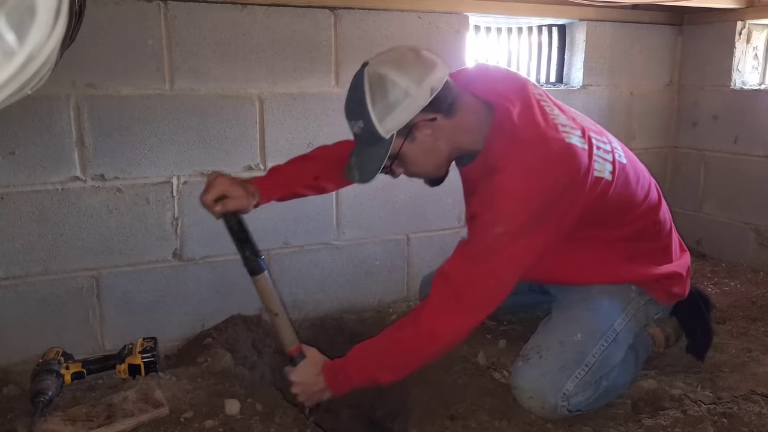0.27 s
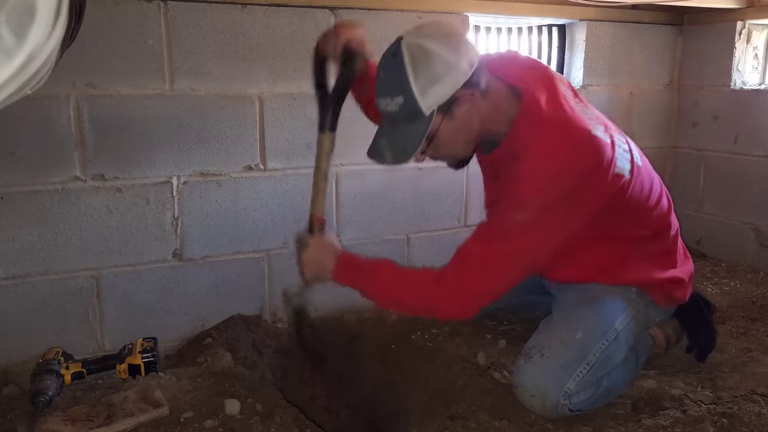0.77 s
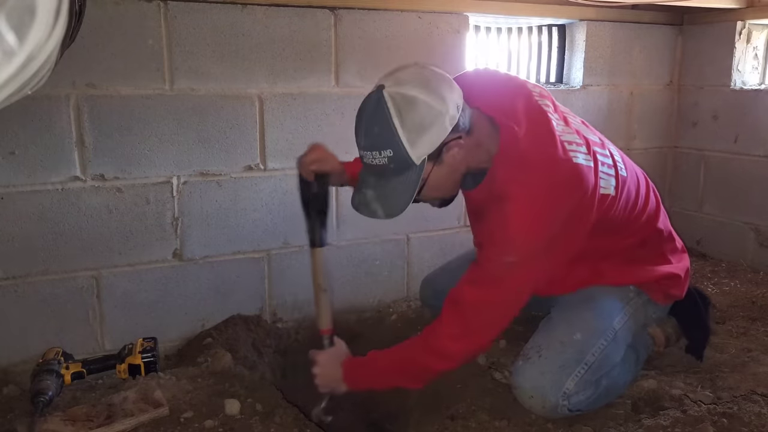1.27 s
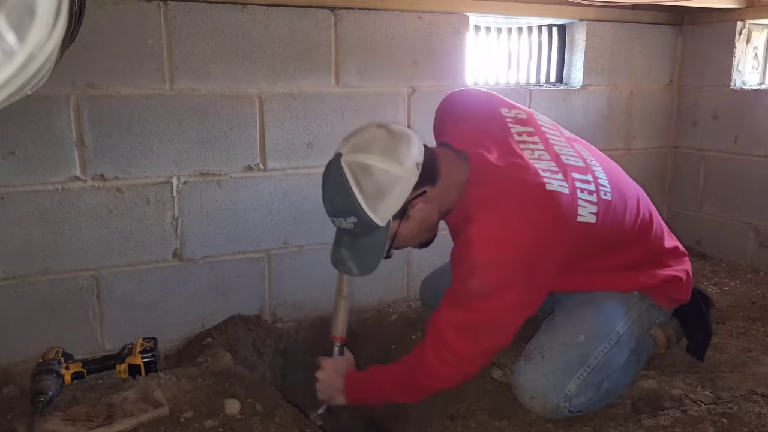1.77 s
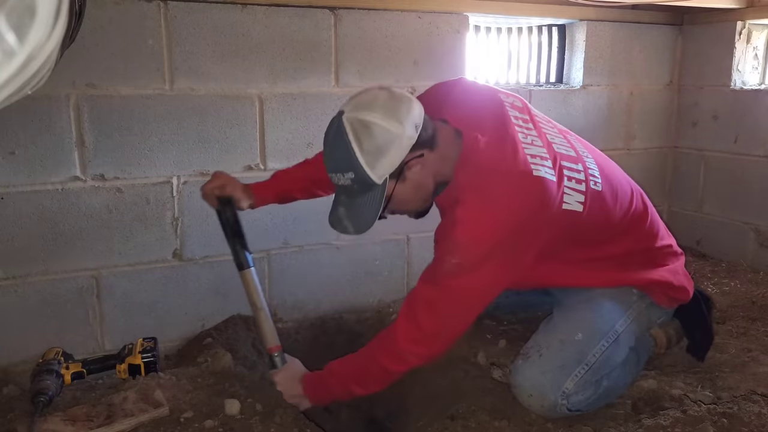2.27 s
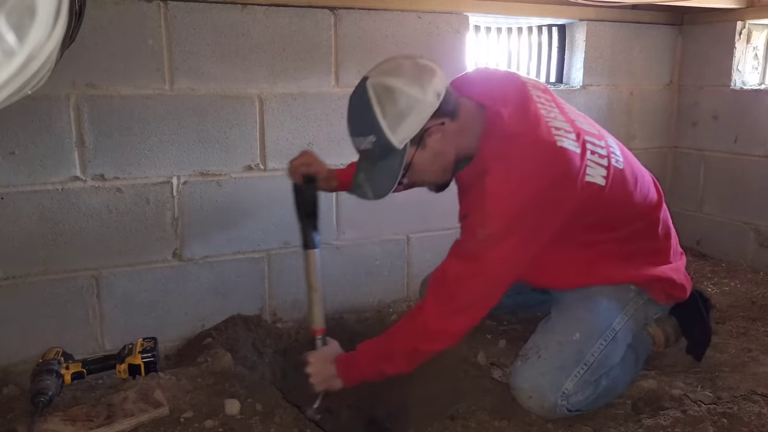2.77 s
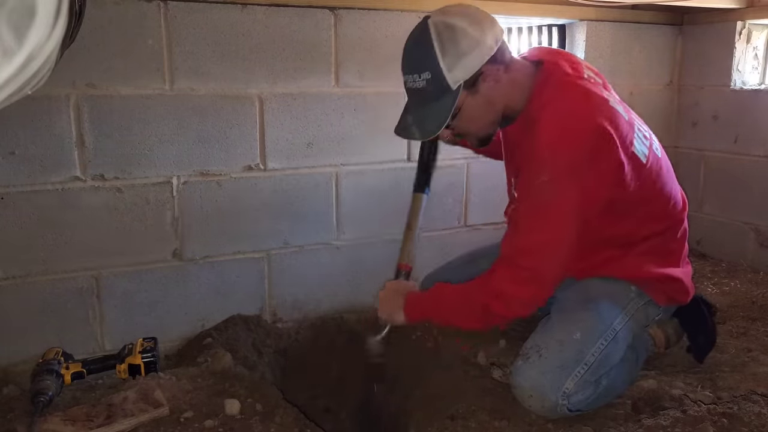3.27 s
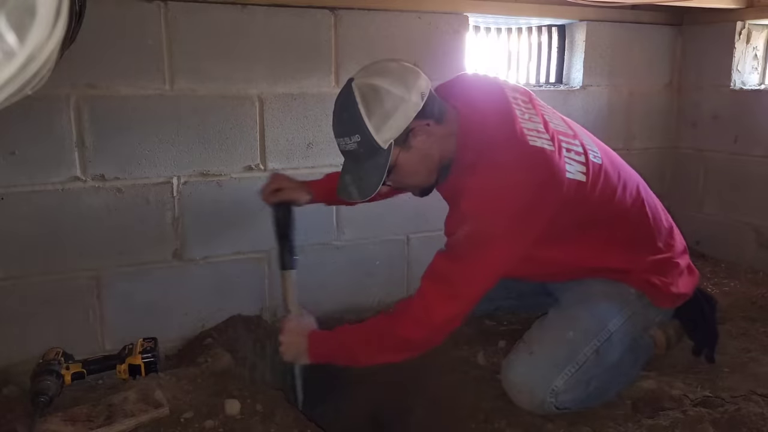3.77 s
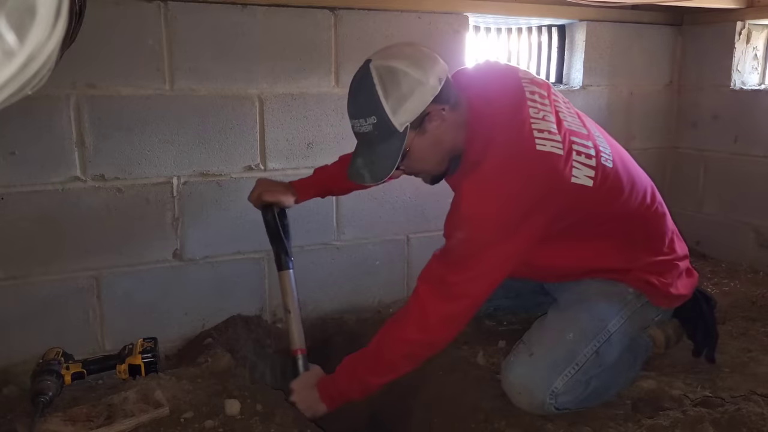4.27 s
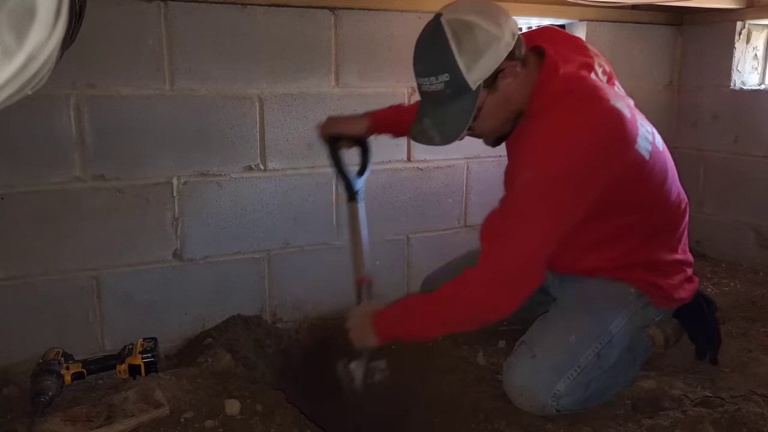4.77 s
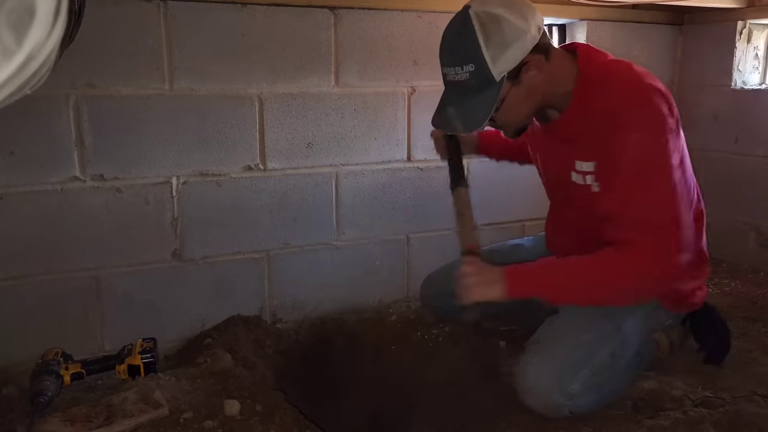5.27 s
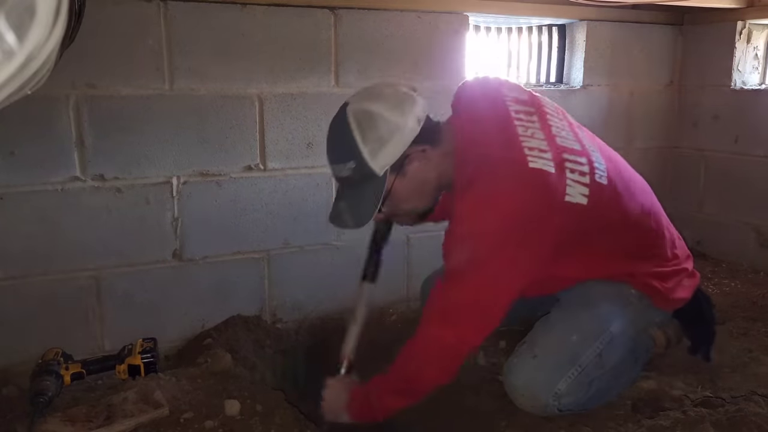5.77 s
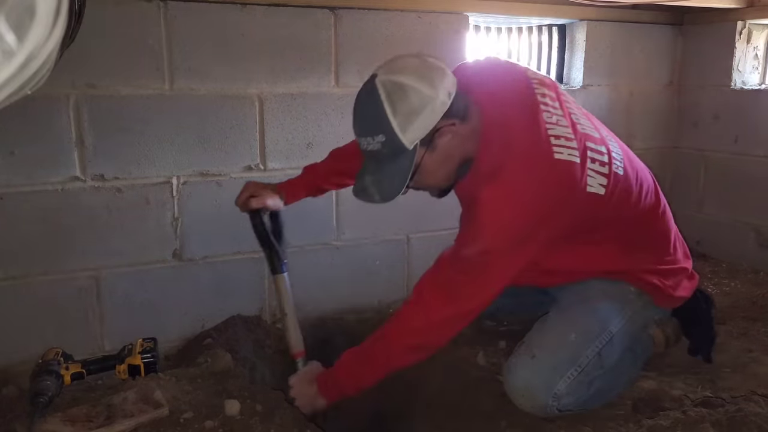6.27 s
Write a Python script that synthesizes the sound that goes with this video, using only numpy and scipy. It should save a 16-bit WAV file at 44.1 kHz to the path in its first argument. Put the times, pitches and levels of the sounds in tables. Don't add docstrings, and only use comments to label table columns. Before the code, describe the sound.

Steel bites gravelly earth in irregular bursts: bright gritty cracks, short dull mid-pitched clanks quickly choked by soil, and soft low thumps under the hardest blows. Between them come scrapes, stone scuffs and tiny trickles of dirt, with near-quiet gaps. The sound is slightly left of a phone microphone, with a short, dense, bass-leaning room tail, a wavering low hum and slight hiss.

```python
import sys
import numpy as np
from scipy import signal
from scipy.fft import rfft, irfft
from scipy.io import wavfile
from scipy.ndimage import uniform_filter1d

SR = 44100
rng = np.random.default_rng(int(sys.argv[2]) if len(sys.argv) > 2 else 0)


def store_wav(level_fs):
    pcm = np.round(np.clip(np.atleast_2d(level_fs), -1, 1) * 32767)
    wavfile.write(sys.argv[1], SR, pcm.T.astype(np.int16))


def makeup_ratio(level_db):
    decades = np.asarray(level_db, float) / 20
    return 10 ** decades


N = 287532


def ring(x, hz, t60):
    pole = np.exp(2j * np.pi * hz / SR - np.log(1000) / (t60 * SR))
    gain = np.sqrt(2 - 2 * abs(pole) ** 2)
    return signal.lfilter([gain], [1, -pole], x).imag


def walk(ms):
    position = np.arange(N) / (ms * 0.00091 * SR)
    return np.interp(position, np.arange(N // 20), rng.standard_normal(N // 20))


def grains(spread_db, clump_ms, clump_db):
    noise = rng.standard_normal(N)
    level_db = spread_db * rng.exponential(size=N) + clump_db * walk(clump_ms)
    x = noise * makeup_ratio(level_db)
    return x / np.std(x)


def bandpass(x, order, low_hz, high_hz):
    return signal.sosfilt(signal.butter(order, [low_hz, high_hz], "bandpass", fs=SR, output="sos"), x)


def shape(x, points):
    hz, db = np.transpose(points)
    f = np.maximum(np.fft.rfftfreq(x.shape[-1], 1 / SR), 1)
    y = irfft(rfft(x) * makeup_ratio(np.interp(np.log(f), np.log(hz), db)), x.shape[-1])
    return y / np.std(y)


def add(track, start_s, x):
    i = int(start_s * SR)
    track[i:i + len(x)] += x[:N - i]


# peak in seconds, grit peak in dB, blade in dB, lead mode in Hz.
CRACKS = [(.414, -33.5, -33.5, 560), (.492, -24.5, -30, 646), (.657, -26, -35.5, 923),
          (2.027, -53.5, -70, 648.6), (2.0707, -44, -68, 642), (2.2904, -63.5, -38.5, 688),
          (2.3705, -16.5, -11, 632), (2.4773, -20.5, -18, 437), (2.5054, -31, -37, 507),
          (2.9627, -37.5, -32, 652), (3.0814, -21, -25, 630), (3.7249, 0.5, -8, 427.2),
          (4.065, -43, -59, 620), (4.166, -50, -26, 590), (4.4802, -17.5, -23.5, 680),
          (4.8434, -37.5, -40, 596), (5.0509, -12, -26, 993), (5.1811, -43.5, -77.5, 670),
          (5.3163, -40.5, -53, 492)]
# [s, dB, dB, Hz].
CRUNCHES = [(.0624, -27, -23, 675), (.3845, -32.5, -48, 544), (.8435, -50, -49, 1013),
            (1.1638, -5.5, -15.5, 622), (1.9106, -17.5, -30, 655), (2.4189, -15.5, -14.5, 485),
            (2.5336, -43, -27.5, 400), (2.7437, -53.5, -51.5, 655), (3.3174, -69, -45.5, 445),
            (3.732, -14, -13, 390), (4.3276, -36, -49, 500), (4.4488, -37, -61, 557),
            (4.5256, -20, -27.5, 679), (4.9576, -31.5, -51, 476), (6.068, -36.5, -58, 950),
            (6.1684, -35, -38.5, 636), (6.4474, -50.5, -40, 622)]
# [s, dB, dB, Hz].
SCUFFS = [(.008, -33.5, -33.5, 655), (.032, -47, -30.5, 655), (.36, -53, -41.5, 990), (.46, -25, -34, 646),
          (.698, -26, -23.5, 650), (1.16, -19.5, -51, 619), (1.172, -19, -40, 680), (1.205, -21, -20, 299),
          (1.909, -31, -45, 634), (2.195, -65, -46.5, 603), (2.645, -67, -56, 317.5), (3.14, -60, -34, 700),
          (3.39, -63.5, -44.5, 624), (3.72, -23, -33, 608), (3.947, -31, -36, 700), (4.29, -43, -45, 610),
          (4.44, -57, -37, 590), (4.985, -42, -47.5, 380), (5.207, -47, -63, 666),
          (5.914, -14.5, -40.5, 526), (5.942, -40, -21.5, 830), (6.2, -51, -35, 434),
          (6.287, -36, -34, 662), (6.4, -64, -52, 627), (6.515, -24.5, -32, 645)]
# [s, dB, dB, Hz].
GRINDS = [(.432, -28.5, -32.5, 510), (.509, -11.5, -27, 640), (.585, -43, -40.5, 586), (.73, -16, -30, 926),
          (1.27, -46, -53, 448.3), (2.555, -41.5, -31, 441), (2.578, -43, -30.5, 469.6),
          (2.6, -47, -38, 383), (2.985, -26, -30.5, 696), (3.435, -37, -64.5, 670), (4.01, -28.5, -32, 667),
          (4.106, -58, -39.5, 680), (4.195, -30.5, -33, 596), (4.352, -36.5, -36, 482.4),
          (4.61, -32.5, -47, 560), (5.018, -49, -46, 560), (5.926, -8.5, -23, 1003)]


def contacts(crackle, shake):
    knock_rise_ms = 1.0
    # events, their delay in s, rise in ms and crumbling time in ms
    kinds = [(CRACKS, knock_rise_ms / 1000, knock_rise_ms, 2.6),
             (CRUNCHES, knock_rise_ms / 1000, knock_rise_ms, 7.33),
             (SCUFFS, 0, 2.1, 4),
             (GRINDS, 0, 11, 7)]
    lead_level_db, lead_t60_s = -0.5, 0.024
    grit, force, lead = np.zeros((3, N))
    for rows, delay_s, rise_ms, fall_ms in kinds:
        for s, grit_db, blade_db, lead_hz in rows:
            peak_s = s + delay_s
            a, b = max(int((peak_s - .06) * SR), 0), min(int((peak_s + .2) * SR), N)
            ms = 1000 * (np.arange(a, b) / SR - peak_s)
            env = np.where(ms < 0, np.exp(-(ms / rise_ms) ** 2), np.exp(-ms / fall_ms))
            push = makeup_ratio(blade_db) * env ** 1.88
            grit[a:b] += makeup_ratio(grit_db - 5.5) * env * crackle[a:b]
            force[a:b] += push * shake[a:b]
            skips = 0.12 * np.cos(2 * np.pi * lead_hz * ms / 1000) + 0.41 * shake[a:b]
            lead[a:b] += makeup_ratio(lead_level_db) * ring(push * skips, lead_hz, lead_t60_s)
    return grit, force, lead


# pitch in Hz, level in dB per Hz.
GRIT_COLOUR = [(710, -34), (1200, -5), (2000, -4.5), (3400, -3.5), (5600, -3.5), (8000, -4.5),
               (9800, -11.5), (12700, -7.5), (15700, -17.5), (16400, -36.5)]


def gravel(x):
    patch_ms, patch_db = 4.0, 2.8
    edges = np.geomspace(700, 17000, num=12)
    mix = np.zeros(N)
    for low_hz, high_hz in zip(edges, edges[1:]):
        mix += bandpass(x, 2, low_hz, high_hz) * makeup_ratio(patch_db * walk(patch_ms))
    return shape(mix, GRIT_COLOUR)


# pitch in Hz, level in dB, 60 dB decay in seconds.
BLADE_MODES = [(348, -11.5, .07), (481.7, -2, 0.085), (560, -5.5, 0.12), (655, -5, 0.087),
               (700, 4.5, 0.017), (830, -3.5, 0.031), (990, 2, 0.043), (1250, -6, 0.02),
               (1406, -6.5, 0.013), (1697, -17.5, 0.08), (1950, -19, 0.026), (2125, -13.5, 0.024),
               (2860, -17, 0.01), (3160, -25.5, 0.012), (3600, -12.5, 0.01)]


def blade_in_soil(force):
    longest_t60_s = .07
    return sum(makeup_ratio(db - 9.0) * ring(force, hz, min(t60, longest_t60_s)) for hz, db, t60 in BLADE_MODES)


# start in seconds, peak in dB, pitch in Hz, held time in ms.
CHATTER = [
    (1.166, -6.5, 640.5, 6.5),
    (1.198, -24, 622, 11.8),
    (2.37, -21, 560, 5.6),
    (2.6, -38.5, 331, 52),
    (3.724, -12.5, 386.4, 6.4),
    (3.727, -11.5, 887, 4.8),
    (5.918, -16, 428, 7.3),
    (5.932, -14, 841, 11),
    (6.17, -45, 693, 140),
    (6.36, -46, 654, 94),
]


def chatter():
    out, t = np.zeros(N), np.arange(int(.25 * SR)) / SR
    for s, db, hz, held_ms in CHATTER:
        skips = makeup_ratio(3.9 * walk(5.0)[:len(t)])
        phase_drift = 0.19 * walk(18.0)[:len(t)]
        drive = np.cos(2 * np.pi * hz * t + phase_drift) * skips * (t < held_ms / 1000)
        tone = ring(drive, hz, 0.024)
        add(out, s, makeup_ratio(db) * tone / np.abs(tone).max())
    return out


# start in seconds, held seconds, grit in dB, blade in dB.
SCRAPES = [(0, 0.017, -45.5, -34), (.07, 0.01, -43.5, -41), (.11, 0.037, -53.5, -42.5),
           (0.422, 0.051, -42, -35.5), (0.498, 0.0067, -30, -34), (.76, 0.021, -44.5, -45.5),
           (.54, 0.072, -57.5, -40), (.66, .02, -45.5, -37), (0.691, 0.025, -29.5, -29.5),
           (2.168, 0.093, -57.5, -52), (2.438, 0.065, -45, -30), (2.531, 0.049, -49.5, -38.5),
           (2.962, 0.15, -46.5, -43), (3.152, 0.12, -61.5, -48.5), (3.862, .13, -49.5, -45),
           (4.03, 0.067, -47.5, -43.5), (4.18, 0.071, -54.5, -44.5), (4.332, 0.021, -48.5, -38.5),
           (4.498, 0.11, -43.5, -35.5), (4.83, 0.032, -51.5, -49), (4.9, .12, -56.5, -50.5),
           (5.231, 0.084, -63.5, -57.5), (6.091, 0.09, -50.5, -47.5), (6.182, 0.11, -47, -40.5),
           (6.359, 0.048, -64.5, -57.5), (6.455, 0.057, -47, -39.5)]
# start in seconds, held seconds, grit in dB.
TRICKLES = [(0.219, 0.0046, -66), (.27, .01, -75.5), (.36, 0.025, -63), (1.52, 0.0088, -64.5),
            (1.571, 0.011, -66), (1.651, 0.028, -76), (1.969, 0.015, -69), (2.028, .01, -71.5),
            (2.09, .02, -57.5), (2.32, 0.044, -65.5), (2.74, 0.018, -75.5), (3.418, 0.01, -46),
            (3.8, 0.099, -62), (4.12, 0.059, -57.5), (4.4, 0.025, -57), (4.8, 0.0089, -57.5),
            (5.099, 0.0074, -66), (5.38, 0.087, -74), (5.49, 0.054, -62.5), (5.6, 0.14, -81.5),
            (6.0, 0.01, -51.5)]


def slide(crackle, shake):
    scrape_rise_db_s, scrape_fade_db_s = 901, 518.5
    trickle_rise_db_s, trickle_fade_db_s = 301, 302.5
    trickle_blade_db = -5
    dust_loss = 0.29
    rows = [(*row, scrape_rise_db_s, scrape_fade_db_s) for row in SCRAPES]
    rows += [(s, held, db, db + trickle_blade_db, trickle_rise_db_s, trickle_fade_db_s)
             for s, held, db in TRICKLES]
    t = np.arange(N) / SR
    grit, dust, force = np.zeros((3, N))
    for s, held, grit_db, blade_db, rise_db_s, fade_db_s in rows:
        near = slice(max(int((s - .2) * SR), 0), int((s + held + .3) * SR))
        rise_db = np.minimum(rise_db_s * (t[near] - s), 0)
        fade_db = fade_db_s * np.maximum(t[near] - s - held, 0)
        env = makeup_ratio(rise_db - fade_db)
        grit[near] += makeup_ratio(grit_db) * env
        dust[near] += makeup_ratio(grit_db - dust_loss * (blade_db - grit_db)) * env
        force[near] += makeup_ratio(blade_db) * env
    dull = signal.lfilter(*signal.butter(1, 5000, fs=SR), crackle)
    return grit * dull + dust * (crackle - dull), makeup_ratio(-7.0) * force * shake


# start in seconds, peak in dB, deep boom in dB, ring in seconds.
THUMPS = [(0.031, -41.5, -7, 0.47), (0.43, -45, -12, 0.2), (0.761, -43.5, -26.5, 0.21),
          (1.166, -25.5, -5.5, 0.34), (1.915, -40, 7, 0.15), (2.475, -42, -11.5, 0.17),
          (2.532, -36, -8, 0.22), (3.09, -45, -11.5, 0.26), (3.726, -19, -5, 0.21), (4.007, -44, -14, 1),
          (4.167, -43, -13, 0.69), (4.48, -44, -12.5, 0.57), (4.95, -43, -10.5, 0.49),
          (5.048, -42, -11.5, 0.15), (5.91, -22.5, -11, 0.15), (5.989, -33, -8.0, 0.35)]
# pitch in Hz, level in dB.
GROUND_MODES = [(50, -2.5), (70, -12.5), (88, 0.5), (120, 3), (146, -0.5), (208, -1), (257, -6)]


def thumps():
    out = np.zeros(N)
    t = np.arange(int(.5 * SR)) / SR
    for s, db, deep_db, t60 in THUMPS:
        push = np.exp(-t / 0.0078) * (1 - np.exp(-t / 0.0058)) * rng.standard_normal(len(t))
        boom = np.zeros(len(t))
        for i, (hz, mode_db) in enumerate(GROUND_MODES):
            mode = ring(push, hz, t60 * (90 / hz) ** 0.2)
            gain = makeup_ratio(mode_db + (deep_db if i == 0 else 0))
            boom += gain * mode / np.abs(mode).max()
        add(out, s, makeup_ratio(db - 5.5) * bandpass(boom, 3, 42, 300))
    return out


# pitch in Hz, level in dB, 60 dB decay in seconds.
FREE_MODES = [(3472, -3, .36), (4177, -2, .19), (4328, -7, .12), (4576, -9, .36), (4870, -11, .15),
              (5329, -11, .22), (6450, -5, .08)]


def flick():
    start_s, skid_s, tick_db, ring_db = 1.546, .014, -31.5, -36
    out, t = np.zeros(N), np.arange(int(.4 * SR)) / SR
    push = rng.standard_normal(len(t)) * np.exp(-t / skid_s)
    sound = makeup_ratio(tick_db) * bandpass(push, 4, 5900, 14000)
    for hz, db, t60 in FREE_MODES:
        mode = ring(push, hz, t60)
        sound += makeup_ratio(ring_db + db) * mode / mode.max()
    add(out, start_s, sound)
    return out


def room(direct, x):
    low_t60_s, mid_t60_s, high_t60_s = 0.2, 0.1, 0.1
    direct_db = -1.5
    t = np.arange(int(.4 * SR)) / SR
    noise = rng.standard_normal((8, len(t)))
    low = signal.lfilter(*signal.butter(2, 380, fs=SR), noise[:3])
    mid = signal.lfilter(*signal.butter(2, [380, 1000], "bandpass", fs=SR), noise[3:6])
    high = signal.lfilter(*signal.butter(2, 1000, "highpass", fs=SR), noise[6:])
    tail = 0.88 * (low[2] + 0.057 * low[:2]) * makeup_ratio(-60 * t / low_t60_s)
    tail = tail + 0.47 * (mid[2] + 0.4 * mid[:2]) * makeup_ratio(-60 * t / mid_t60_s)
    tail = tail + high * makeup_ratio(-60 * t / high_t60_s)
    tail = tail * (1 - np.exp(-t / 0.00098))
    tail = tail / np.sqrt(np.sum(tail[0] ** 2))
    heard = makeup_ratio(direct_db) * direct + signal.fftconvolve(x[None], tail, axes=1)[:, :N]
    spectrum = rfft(heard)
    power = np.abs(spectrum) ** 2 / (np.abs(rfft(direct)) ** 2 + 1e-9)
    smooth = uniform_filter1d(np.minimum(power, 8), size=1600)
    smooth = uniform_filter1d(smooth, size=1600)
    return irfft(spectrum / np.sqrt(smooth), N)


# pitch in Hz, level in dB per Hz.
HUM_COLOUR = [(20, -28), (45, -18), (65, -6.5), (88, 4), (115, -8.5), (155, -7), (190, -17.5), (250, -25),
              (330, -21), (1000, -30), (2500, -37.5), (4000, -35.5), (6000, -43), (16000, -57)]


def hum():
    noise = rng.standard_normal((3, N))
    low = signal.lfilter(*signal.butter(1, 500, fs=SR), noise)
    steps = np.repeat(rng.standard_normal(N // 2000 + 1), 2000)[:N]
    swell = makeup_ratio(0.28 * uniform_filter1d(steps, size=2000))
    hiss = 0.86 * (noise - low)[:2]
    return makeup_ratio(-56) * shape(low[2] * swell + hiss, HUM_COLOUR)


def at_phone(shovel):
    shade_db, lag_samples = 1.2, 4
    treble = signal.lfilter(*signal.butter(1, 900, "highpass", fs=SR), shovel)
    far = shovel - (1 - makeup_ratio(-shade_db)) * treble
    return np.array([shovel, np.roll(far, shift=lag_samples)])


def scene():
    blow_crackle = gravel(grains(spread_db=3.0, clump_ms=1.5, clump_db=3.5))
    blow_grit, blow_force, lead = contacts(blow_crackle, grains(2.7, 1.5, 1.3))
    slide_crackle = gravel(grains(spread_db=2.8, clump_ms=2.5, clump_db=3.0))
    slide_grit, slide_force = slide(slide_crackle, grains(2.0, 6.6, 2.8))
    blade = lead + chatter() + blade_in_soil(blow_force + slide_force)
    blade = signal.sosfilt(signal.butter(4, 310, "highpass", fs=SR, output="sos"), blade)
    shovel = blow_grit + slide_grit + blade + flick() + thumps()
    port_db = [[3.4], [2.0]]
    return makeup_ratio(port_db) * room(at_phone(shovel), shovel) + hum()


def roll_off(x):
    return signal.sosfilt(signal.butter(12, 16500, fs=SR, output="sos"), x)


def record(dry):
    cut = signal.sosfilt(signal.ellip(6, .3, 30, 15750, fs=SR, output="sos"), dry)
    mix = np.clip(cut, -1, 1)
    return roll_off(mix)


dry = scene()
out = record(dry)
store_wav(out)
```